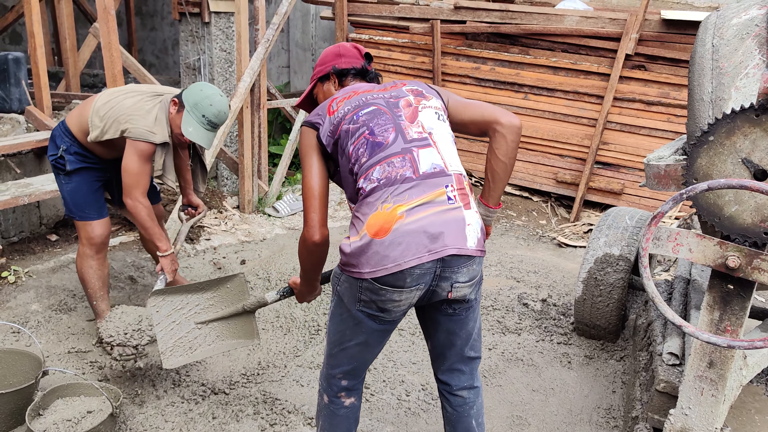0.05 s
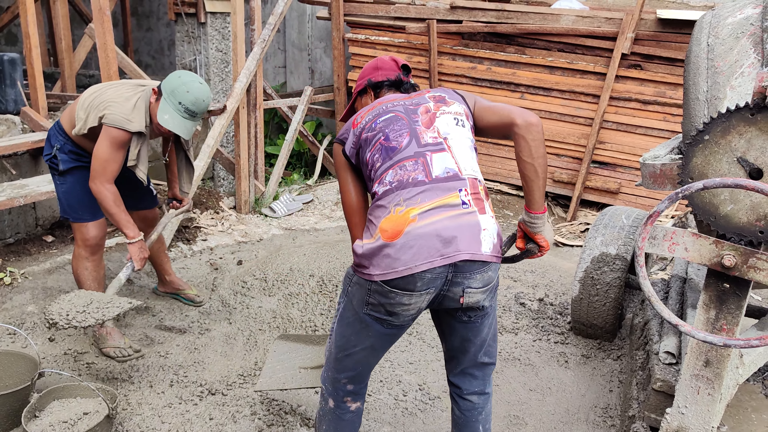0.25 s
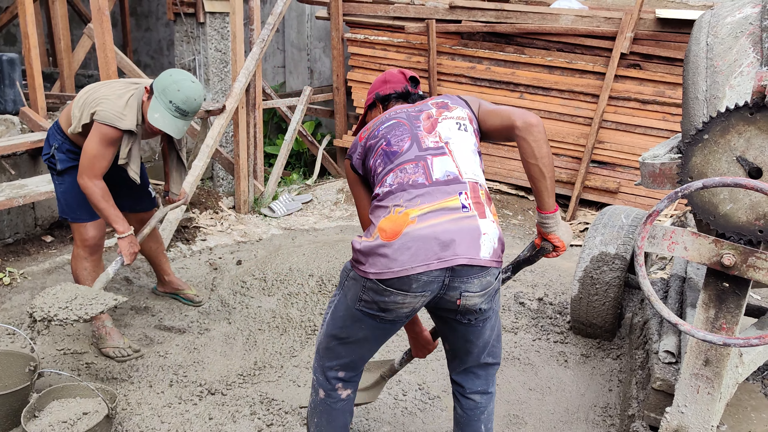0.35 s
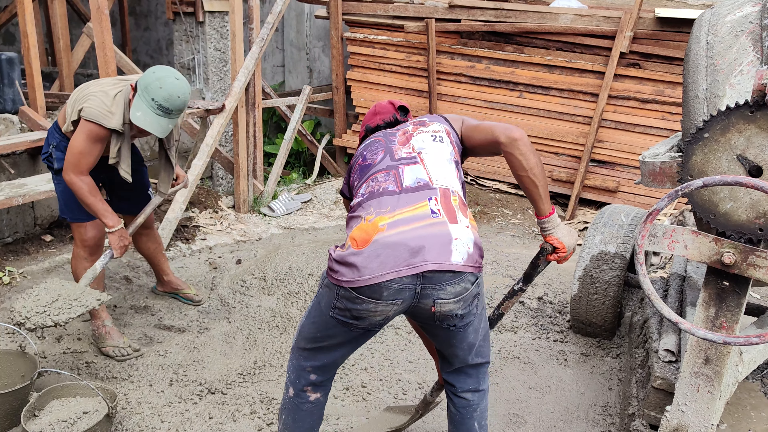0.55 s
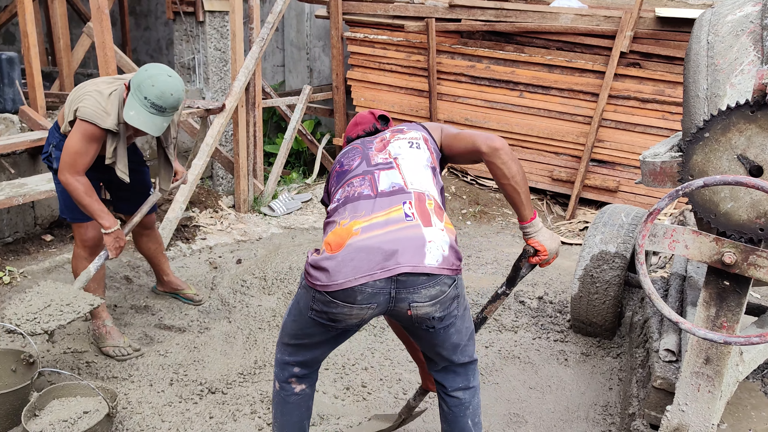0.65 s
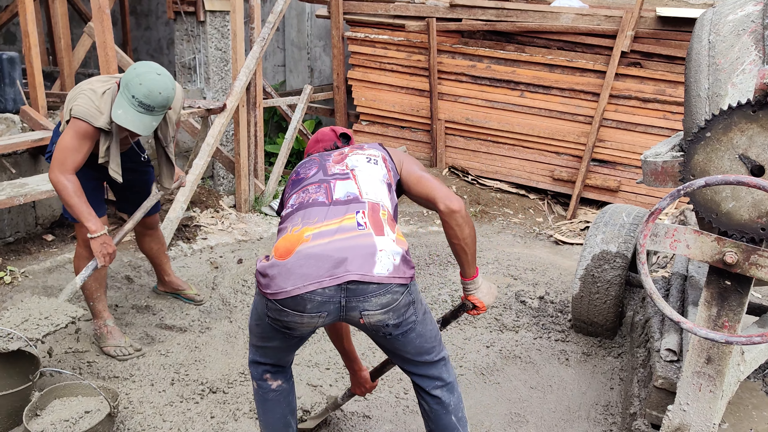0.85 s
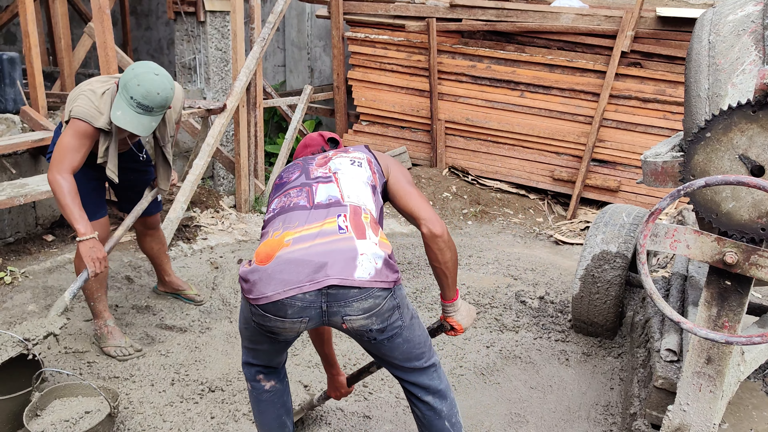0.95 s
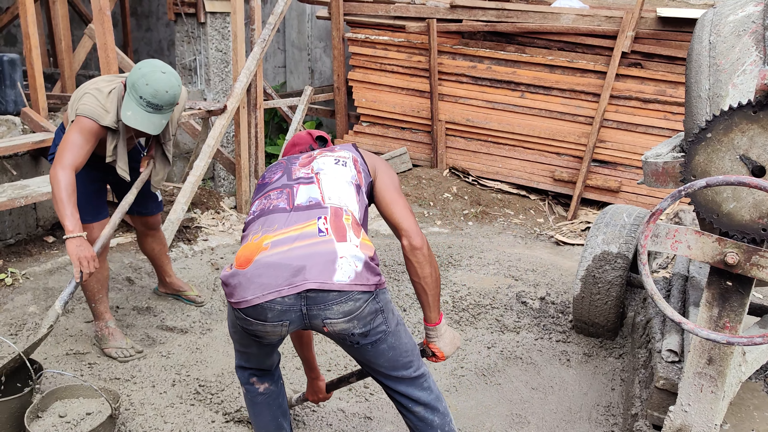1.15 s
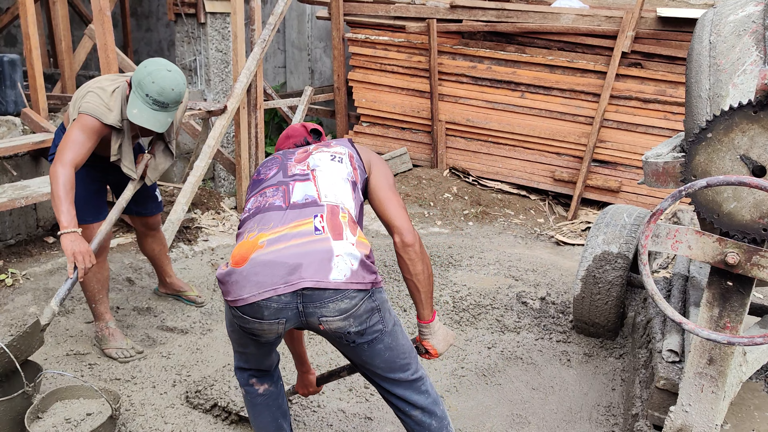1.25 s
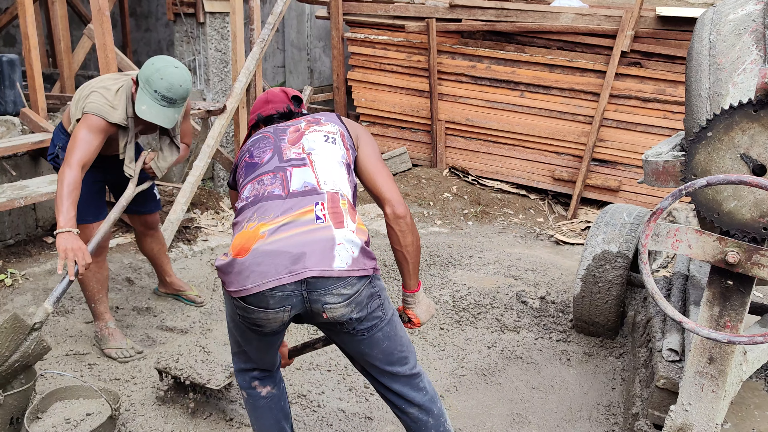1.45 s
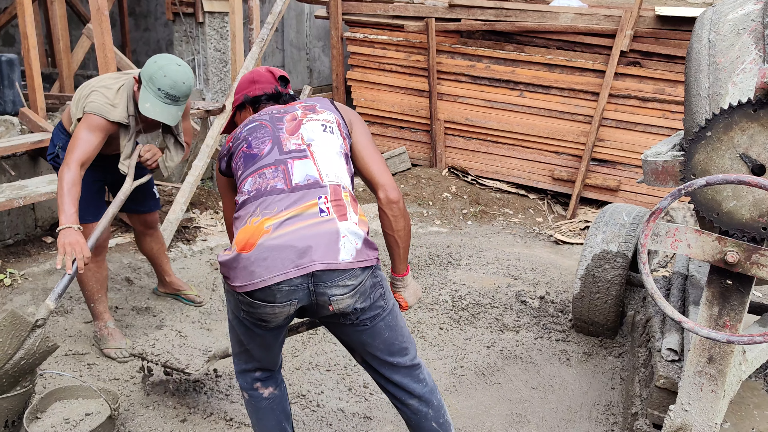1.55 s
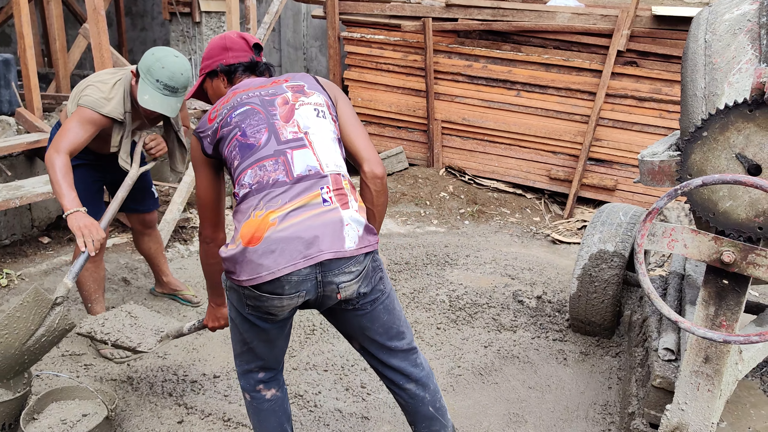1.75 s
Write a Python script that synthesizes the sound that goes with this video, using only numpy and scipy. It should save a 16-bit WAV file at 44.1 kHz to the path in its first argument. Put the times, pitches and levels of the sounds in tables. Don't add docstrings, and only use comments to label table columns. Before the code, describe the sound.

A steel shovel scrapes gritty wet concrete after a lumpy load thuds and splats into a bucket

```python
import sys
import numpy as np
from scipy import signal
from scipy.fft import rfft, irfft
from scipy.io import wavfile
from scipy.ndimage import uniform_filter1d

SR = 44100
rng = np.random.default_rng(int(sys.argv[2]) if len(sys.argv) > 2 else 0)


def undo_db(level):
    steps = np.asarray(level, float) / 20
    return 10 ** steps


def transcribe(signal):
    frames = np.atleast_2d(signal).T
    limited = np.clip(frames, -1, 1)
    pcm = np.round(limited * 32767).astype(np.int16)
    wavfile.write(sys.argv[1], SR, pcm)


N = 79380
T = np.arange(N) / SR
HZ = np.maximum(np.fft.rfftfreq(N, 1 / SR), 10)

# t/s, level/dB
SITE = [(0, -39), (.06, -42.5), (.09, -41.5), (.145, -42.5), (.165, -46), (.23, -44.5), (.278, -57),
        (.3, -57), (.44, -44.5), (.465, -56), (.52, -62), (.55, -59.5), (.59, -62), (.605, -40),
        (.72, -46.5), (1.6, -44), (1.7, -43.5), (1.8, -44)]
# f/Hz, level/dB
SITE_COLOUR = [(15, -27), (25, -1.5), (335, -8), (503, -15), (1610, -8.5), (1740, -15), (3520, -4),
               (14800, -12.5), (16000, -17)]

# t/s, level/dB, length/s, tilt/(dB per octave)
SPLATS = [(0.09, -36, 0.012, 10), (0.23, -41, 0.014, 5), (0.284, -40.5, 0.064, -1),
          (0.301, -45.5, 0.025, -9.5), (0.359, -39, 0.071, -3.5), (0.415, -35, 0.011, 0),
          (0.417, -47, 0.052, -2.5), (0.469, -42, 0.071, -14), (0.471, -42, 0.011, -18),
          (0.506, -41, 0.013, -9), (0.532, -42, .009, 5), (0.526, -44, 0.007, 7), (0.57, -34, 0.13, -8),
          (0.588, -52, 0.037, -11), (0.652, -40, 0.016, -5), (0.673, -38, 0.088, -8),
          (0.742, -27.5, 0.043, -3), (1.081, -15.5, 0.014, 0.5), (1.156, -26, 0.15, -4)]
SPLAT_RISE_S = 0.0043

# t/s, level/dB
POUR = [
    (.215, -49),
    (.232, -32.5),
    (.3, -31),
    (.42, -29),
    (.5, -33),
    (.6, -30.5),
    (.69, -27),
    (.76, -38),
    (.82, -37),
]
# f/Hz, level/dB
POUR_COLOUR = [(25, -24), (45, -11), (75, -7), (115, -10), (250, -14.5), (430, -21), (540, -34.5),
               (1500, -50.5)]
# t/s, peak/dB, f/Hz
LUMPS = [(0.229, -11.5, 84.6), (0.271, -17.5, 84), (0.305, -17.5, 62.6), (0.351, -20.5, 68),
         (0.4, -10.5, 77), (0.469, -38, 72.4), (0.522, -16, 69.5), (0.588, -16, 84), (0.626, -23, 79),
         (0.673, -20.5, 73), (0.704, -29, 83), (0.76, -38, 57.4), (0.85, -30.5, 54.3), (0.979, -28, 65),
         (1.19, -25, 70.4), (1.25, -33.5, 60), (1.409, -37, 62), (1.585, -36, 84), (1.641, -28.5, 78.4),
         (1.777, -36, 70)]
LUMP_CYCLES, LUMP_DB, POUR_DB = 0.94, -8, -1.5

# t/s, level/dB, f/Hz, t60/s
KNOCKS = [(0.386, -31.5, 321, 0.13), (.415, -32.5, 810, 0.055), (0.475, -28.5, 436, 0.038),
          (.6, -19, 407, 0.04), (0.603, -24, 614, 0.025), (0.653, -20.5, 175, 0.072),
          (0.665, -18.5, 5700, 0.022), (0.889, -18, 1158, 0.12), (0.703, -24, 910, 0.026),
          (0.729, -27, 161.7, 0.14), (.765, -26.5, 775, 0.17), (0.815, -9.5, 1240, 0.015),
          (0.999, -13.5, 712, 0.069), (1.080, -29, 9820, 0.022), (1.083, -32, 14560, .03),
          (1.083, -24, 8450, .02), (1.084, -30, 13000, .02), (1.085, -22, 11220, 0.023),
          (.825, -18.5, 980, 0.04), (.905, -19, 1120, 0.071), (.925, -27, 1305, 0.034),
          (.98, -24, 723, .06), (1.015, -22, 1019, .04), (1.2, -31, 946, 0.054), (1.32, -26.5, 592, 0.062),
          (1.438, -31, 385, .06), (0.962, -17, 1515, 0.058), (1.383, -36, 234, 0.17),
          (1.399, -27.5, 400.5, 0.028), (1.486, -30, 191, 0.067), (1.501, -26, 213.5, 0.027),
          (1.524, -29, 243, 0.018), (1.636, -37.5, 233.4, 0.032)]
KNOCK_CLEAR = 0.55

# f/Hz, level/dB, t60/s
RIM = [(1150, 11, 0.039), (1580, 4.7, 0.03), (1930, 12.4, 0.014), (2550, 5.2, 0.026), (3406, 6.7, 0.076),
       (4700, 2, 0.024), (5540, 1.6, 0.024)]
CLANK_S, CLANK_DB, CHATTER_S = 0.5585, -24, 0.0054
RIM_HUM_DB, RIM_CUT_HZ = -11, 5260

# t/s, level/dB, hollow f/Hz, edge rasp level/dB
PUSH = [(0.738, -41, 1400, -43), (0.753, -22.5, 1405, -26.5), (0.776, -27.5, 1380, -33.5),
        (0.794, -31.5, 1346, -38), (0.817, -20, 1300, -31.5), (0.847, -26.5, 1250, -34),
        (0.887, -21.5, 1150, -29), (0.929, -22.5, 1077, -35), (0.958, -22, 1010, -47),
        (1.011, -26, 797, -57), (1.069, -32, 707, -50)]
# f/Hz, level/dB
PUSH_COLOUR = [(35, -34), (70, -17.5), (550, -15.5), (800, -12), (1700, -4.5), (2400, -5.5), (6500, -10),
               (15000, -19)]
# f/Hz, width/Hz, level/dB
PUSH_BLADE = [(1410, 460, 4.5), (1954, 32, 13), (3000, 74, -9), (5730, 840, 9.5)]
GRAINS_PER_S, GRAIN_SPREAD_DB = 12000, 2.5
PEBBLES_PER_S, PEBBLE_DB = 350, -11
JUDDER_DB, BLADE_DB, MODE_SCATTER_DB = 0.88, -3, 4
HOLLOW_DB, HOLLOW_WIDTH_HZ = -7, 303
EDGE_HZ, EDGE_WIDTH_HZ = 5870, 1900

# t/s, level/dB
SLUMP = [(1.04, -45), (1.09, -26), (1.25, -42.5), (1.36, -66), (1.47, -41), (1.495, -41), (1.56, -40),
         (1.66, -43), (1.69, -42), (1.71, -40), (1.8, -52)]
# f/Hz, level/dB
SLUMP_COLOUR = [(30, -5), (80, -7), (245, -4), (430, -13), (700, -12.5), (1300, -24)]

# t/s, level/dB, ring level/dB
DRAG = [(1.072, -29, -45), (1.088, -28, -22), (1.099, -33.5, -32), (1.11, -28.5, -29.5),
        (1.145, -32.5, -33.5), (1.165, -27, -45.5), (1.225, -26, -27.5), (1.27, -33, -41),
        (1.33, -31, -36.5), (1.36, -36, -40.5), (1.41, -38.5, -33), (1.47, -39.5, -54), (1.57, -44, -53)]
# f/Hz, level/dB
DRAG_COLOUR = [(35, -34), (60, -13), (193, -10.5), (371, -0.5), (527, -18), (903, -7.5), (5720, -16.5),
               (14900, -26), (16000, -37)]
# f/Hz, width/Hz, level/dB
DRAG_BLADE = [(604, 138, 10), (917, 11, 15.5), (1690, 320, 5.5), (3120, 380, 14.5), (5700, 2000, 1.5)]
# f/Hz, width/Hz, level/dB
RING = [(368.7, 10.7, 3.5), (401.1, 16.2, 1)]

# f/Hz, share/(0-1)
DIFFUSE = [(60, 0.02), (250, 0), (600, 0), (1200, 0.39), (2500, 0.86), (8000, 0.75)]
# f/Hz, level/dB
BALANCE_DB = [(60, -1), (180, 3), (550, 1), (1650, 0), (4970, -1.5), (15000, 2)]
# f/Hz, lag/ms
PORT_LAG_MS = [(400, 0.3), (1000, 0.21), (1500, 0.28), (3000, 0.3376)]
# f/Hz, width/Hz, depth/(up to 1; below 0 lifts)
PORT_DIPS = [(3896, 360, 0.37), (7880, 1260, 0.38), (14700, 1500, -0.86)]
BASS_CUT_HZ, CUTOFF_HZ = 36, 15750


def rms_one(x):
    return x / np.sqrt(np.mean(x ** 2) + 1e-20)


def peak_one(x):
    return x / np.abs(x).max()


def level(rows, axis=1):
    r = np.array(rows)
    times = np.r_[r[0, 0] - .015, r[:, 0], r[-1, 0] + .06]
    return undo_db(np.interp(T, times, np.r_[-90, r[:, axis], -90]))


def at_hz(points):
    hz, value = np.transpose(points)
    return np.interp(np.log(HZ), np.log(hz + 1e-9), value)


def colour(x, points):
    return rms_one(irfft(rfft(x) * undo_db(at_hz(points)), N))


def drift(rate):
    r = np.exp(-2 * np.pi * rate / SR)
    wander = signal.lfilter([1], [1, -2 * r, r * r], rng.standard_normal(N + 9000))
    return rms_one(wander[9000:])


def resonate(x, hz, width_hz):
    r = np.exp(-np.pi * width_hz / SR)
    zeros = np.array([1, 0, -1]) * (1 - r * r) / 2
    return signal.lfilter(zeros, [1, -2 * r * np.cos(2 * np.pi * hz / SR), r * r], x)


def bump(s, rise_s):
    u = np.maximum(T - s, 0) / max(rise_s, 1e-4)
    return u * np.exp(1 - u)


def grit():
    sizes = undo_db(GRAIN_SPREAD_DB * np.minimum(rng.exponential(1, N), 3))
    grains = sizes * (rng.random(N) < GRAINS_PER_S / SR)
    return rms_one(grains * rng.choice([-1, 1], (3, N)) + .5 * rng.standard_normal((3, N)))


def flexing(x):
    _, _, cells = signal.stft(x, nperseg=1024, noverlap=768)
    field = uniform_filter1d(rng.standard_normal(cells.shape[1:]), size=2, axis=0)
    field = uniform_filter1d(field, size=12, axis=1)
    return signal.istft(cells * undo_db(MODE_SCATTER_DB * rms_one(field)), nperseg=1024, noverlap=768)[1][:, :N]


def site_hiss():
    return undo_db(drift(4)) * level(SITE) * colour(flexing(grit()), SITE_COLOUR)


def splats():
    low_cut = (HZ / 800) ** 3 / (1 + (HZ / 800) ** 3)
    wet = rfft(flexing(grit())) * low_cut
    out = 0
    for s, db, length, tilt_db in SPLATS:
        attack = np.minimum(bump(s, SPLAT_RISE_S) + (T > s + SPLAT_RISE_S), 1)
        fade = np.exp(-(np.maximum(T - s, 0) / length) ** 2.1)
        burst = rms_one(irfft(wet * undo_db(tilt_db * np.log2(HZ / 2000)), N))
        out = out + undo_db(db) * attack * fade * burst
    return out


def bucket():
    lumps = 0
    for s, db, hz in LUMPS:
        lumps = lumps + undo_db(db + LUMP_DB) * bump(s, LUMP_CYCLES / hz) * np.sin(2 * np.pi * hz * (T - s))
    pour = undo_db(POUR_DB + 2.3 * drift(19)) * level(POUR) * colour(grit(), POUR_COLOUR)
    return lumps * [[1], [1], [-1]] + pour


def knocks():
    g, out = grit(), 0
    for s, db, hz, t60 in KNOCKS:
        rise_s, t60 = 0.87 / hz + 0.0019, np.clip(t60, .02, .3)
        rough = resonate(g * bump(s, rise_s), hz, 1.38 / t60)
        rough = rough / np.abs(rough).max(axis=1, keepdims=True)
        age = np.maximum(T - s, 0)
        swell = (1 - np.exp(-age / rise_s)) ** 2 * undo_db(-35 * age / t60)
        clear = peak_one(swell * np.sin(2 * np.pi * hz * age) * [[1], [1], [-1]])
        out = out + undo_db(db + 1.5) * ((1 - KNOCK_CLEAR) * rough + KNOCK_CLEAR * clear)
    return out


def clank():
    hits = flexing(grit()) * np.sqrt(bump(CLANK_S, CHATTER_S / 0.96))
    rung = 0
    for hz, db, t60 in RIM:
        rung = rung + undo_db(db) * resonate(hits, hz, 3.3 / np.clip(t60, .015, .12)) * np.sqrt(t60)
    crack = signal.sosfilt(signal.butter(4, [1500, 4000], "band", fs=SR, output="sos"), hits)
    hum = bump(CLANK_S + 0.0012, 2.07 * CHATTER_S) * np.sin(2 * np.pi * RIM[0][0] * T) * [[1], [1], [-1]]
    dull = signal.butter(8, RIM_CUT_HZ, fs=SR, output="sos")
    struck = peak_one(rung) + undo_db(-12.0) * peak_one(crack) + undo_db(RIM_HUM_DB) * hum
    return undo_db(CLANK_DB + 8.0) * signal.sosfilt(dull, struck)


def scrape(rows, spectrum, blade):
    falls = rng.random(N) < PEBBLES_PER_S * undo_db(4 * drift(20)) / SR
    pebbles = falls * np.tanh(rng.standard_normal((3, N)))
    pebbles = rms_one(signal.lfilter([1], [1, -.6], pebbles))
    judder = undo_db(JUDDER_DB * (drift(12) + drift(40)))
    g = flexing(grit() + undo_db(PEBBLE_DB) * pebbles) * judder
    steel = g
    for k, (hz, width_hz, db) in enumerate(blade):
        steel = steel + undo_db(BLADE_DB + db) * resonate(g, hz, max(width_hz, 15)) * (-1) ** k
    return level(rows) * colour(steel, spectrum)


def hollow():
    s, _, hz, _ = np.transpose(PUSH)
    slow = signal.sosfilt(signal.butter(2, HOLLOW_WIDTH_HZ, fs=SR, output="sos"), grit())
    carrier = np.sin(2 * np.pi * np.cumsum(np.interp(T, s, hz)) / SR)
    return undo_db(HOLLOW_DB + 1.6 * drift(22)) * level(PUSH) * rms_one(slow * carrier)


def edge():
    rasp = resonate(flexing(grit()), EDGE_HZ, EDGE_WIDTH_HZ)
    return level(PUSH, axis=3) * rms_one(resonate(rasp, EDGE_HZ, EDGE_WIDTH_HZ))


def slump():
    return undo_db(2.0 * drift(7.7)) * level(SLUMP) * colour(grit(), SLUMP_COLOUR)


def loaded_ring():
    g, hum = grit(), 0
    for hz, width_hz, db in RING:
        hum = hum + undo_db(db) * resonate(resonate(g, hz, width_hz), hz, 3 * width_hz)
    steady = hum / uniform_filter1d(hum ** 2, size=900) ** 0.29
    return level(DRAG, axis=2) * rms_one(steady)


def ports(x):
    share = np.clip(at_hz(DIFFUSE), 0, 1)
    direct, *scatter = rfft(x)
    late = np.exp(-2j * np.pi * HZ * at_hz(PORT_LAG_MS) / 1000)
    both = np.sqrt(1 - share) * direct * [late ** 0, late] + np.sqrt(share) * np.array(scatter)
    return irfft(both * undo_db(at_hz(BALANCE_DB) * [[.5], [-.5]]), N)


def scene():
    first_blade = scrape(PUSH, PUSH_COLOUR, PUSH_BLADE) + hollow() + edge()
    second_blade = scrape(DRAG, DRAG_COLOUR, DRAG_BLADE) + loaded_ring()
    steel = undo_db(4.0) * (clank() + first_blade + second_blade)
    return ports(site_hiss() + splats() + bucket() + knocks() + steel + slump())


def top_cut(x):
    return signal.sosfilt(signal.butter(12, 16490, fs=SR, output="sos"), x)


def record(dry):
    for hz, width_hz, depth in PORT_DIPS:
        dry = dry - np.clip(depth, -1, .9) * resonate(dry, hz, width_hz)
    dry = signal.sosfilt(signal.butter(2, BASS_CUT_HZ, "high", fs=SR, output="sos"), dry)
    top = signal.cheby2(24, 85, CUTOFF_HZ, fs=SR, output="sos")
    mix = signal.sosfilt(top, dry)
    return top_cut(mix)


dry = scene()
out = record(dry)
transcribe(out)
```